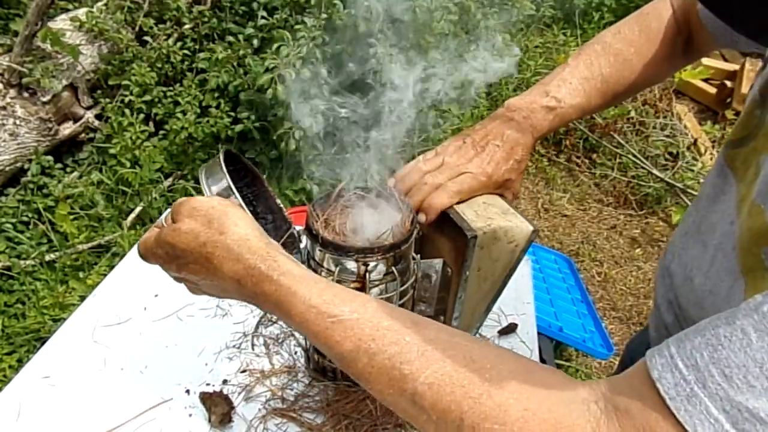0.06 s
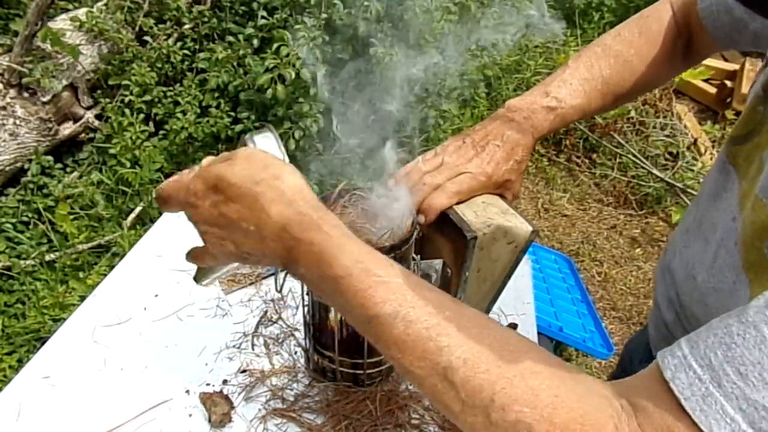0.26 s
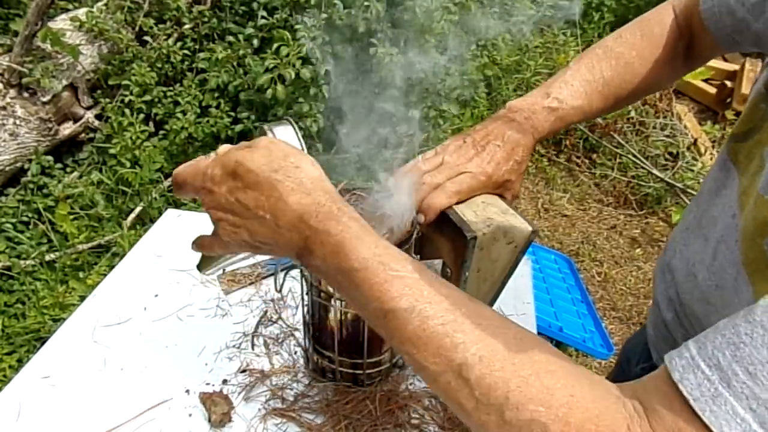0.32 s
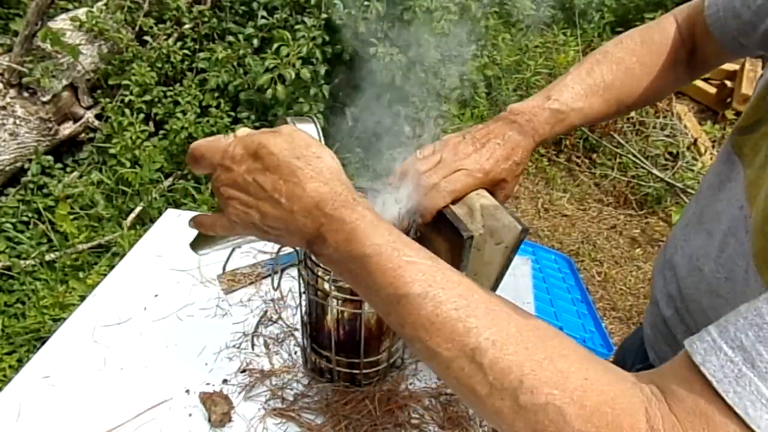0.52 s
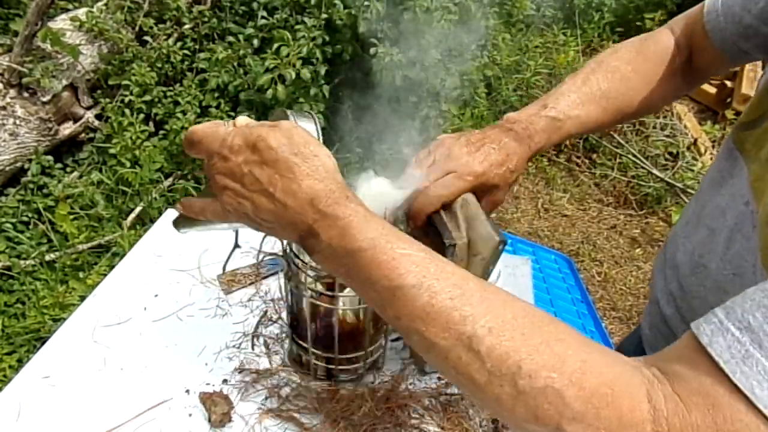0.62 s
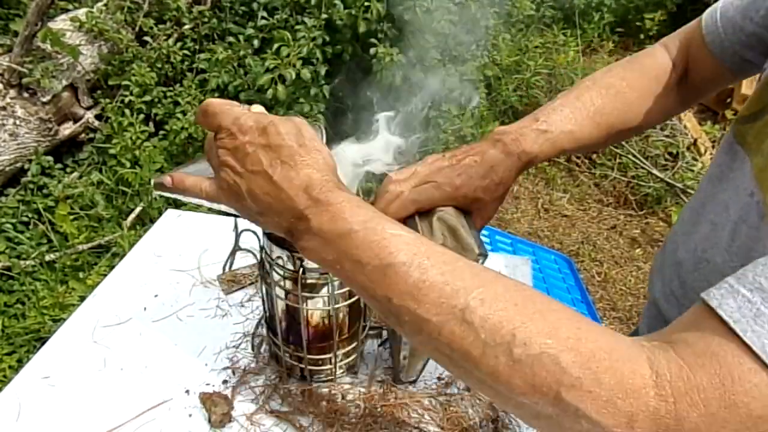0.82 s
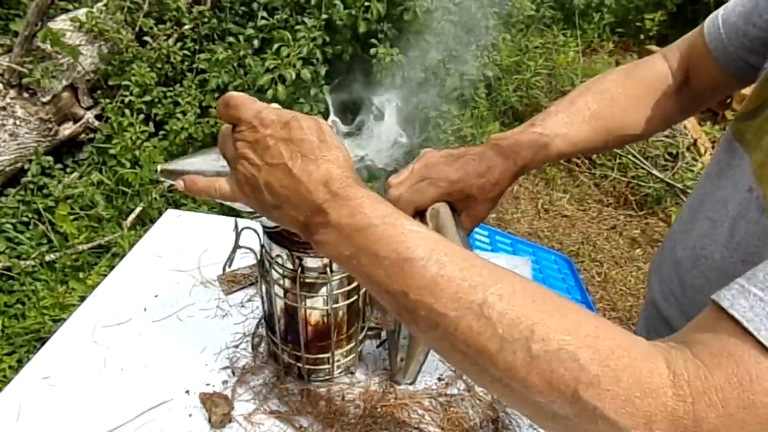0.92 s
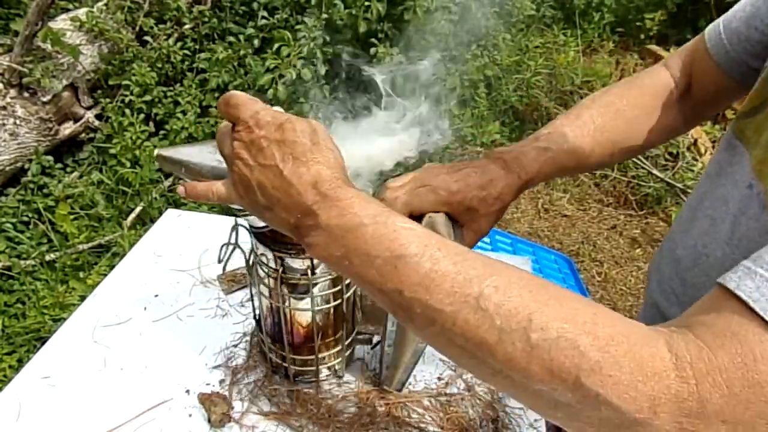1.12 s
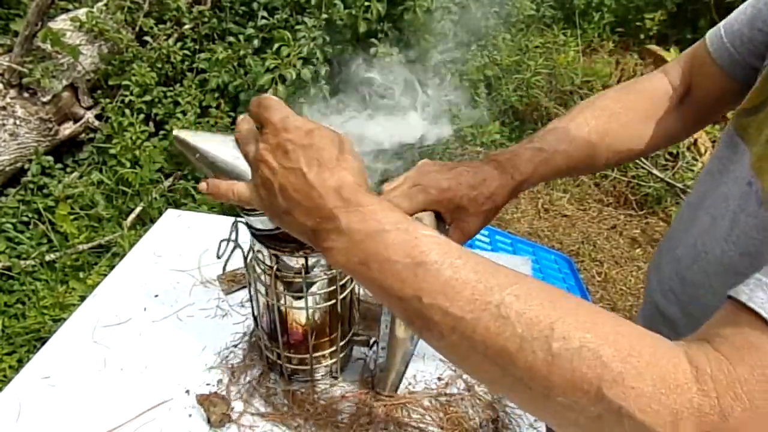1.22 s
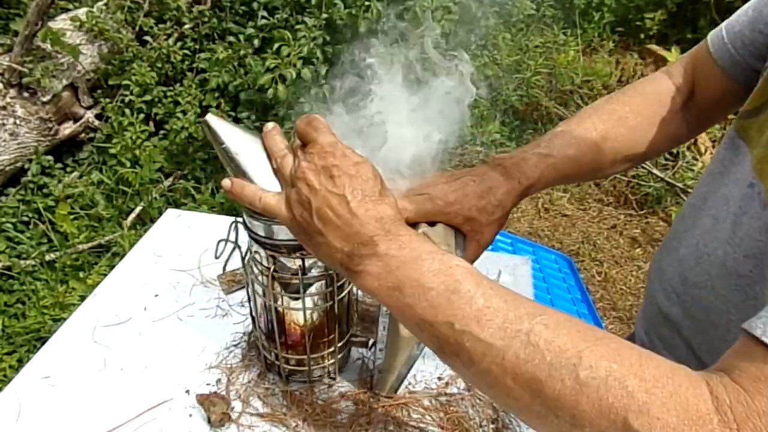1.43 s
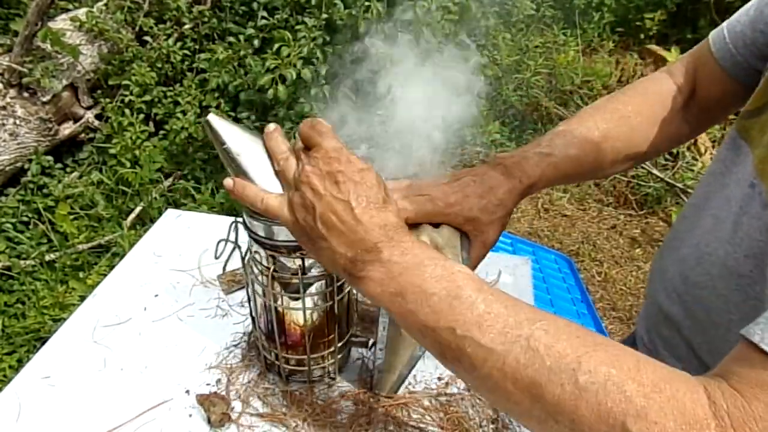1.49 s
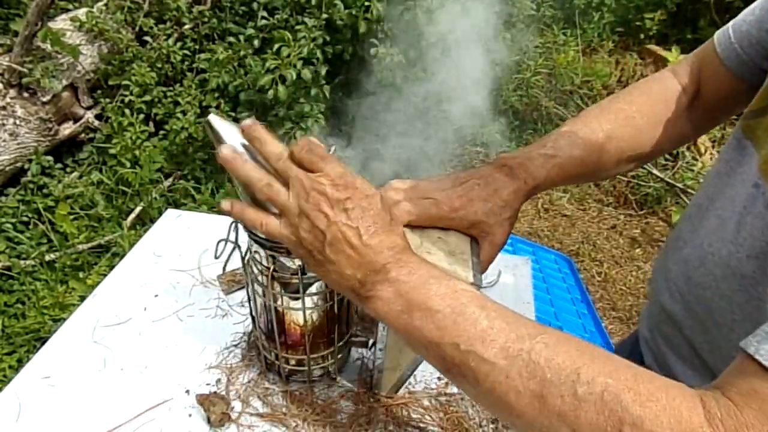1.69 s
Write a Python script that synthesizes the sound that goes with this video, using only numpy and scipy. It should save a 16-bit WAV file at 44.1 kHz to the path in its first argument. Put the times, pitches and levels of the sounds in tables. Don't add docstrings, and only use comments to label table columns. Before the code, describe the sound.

Hand bellows pumping a tin smoker, close up outdoors. Quiet leaf rustle, faint cricket chirps and tiny bird notes run throughout. At 0.2 s a short scrape ends in a sharp wood-and-tin clap with a bright wire snap. Breathy, hollow puffs follow near 0.55, 0.85 and 1.1 s, the last weaker, with valve sighs, dull thumps and metal ticks. After 1.25 s, thin whistles and small clicks fade.

```python
import sys
import numpy as np
from scipy import signal
from scipy.fft import rfft, irfft, next_fast_len
from scipy.io import wavfile
from scipy.ndimage import uniform_filter1d, map_coordinates

SR = 44100
rng = np.random.default_rng(int(sys.argv[2]) if len(sys.argv) > 2 else 0)


def level_to_linear(level):
    exponent = np.asarray(level, float) / 20
    return 10 ** exponent


def master_out(mix):
    frames = np.transpose(np.atleast_2d(mix))
    ceiling = np.clip(frames, -1, 1)
    pcm = np.round(ceiling * 32767).astype(np.int16)
    wavfile.write(sys.argv[1], SR, pcm)


N = 77175
T = np.arange(N) / SR


def unit(x):
    return x / np.sqrt(np.mean(x ** 2) + 1e-20)


def gain(points):
    hz_points, db_points = np.transpose(points)
    return lambda hz: level_to_linear(np.interp(np.log(hz + 1), np.log(hz_points), db_points))


def filtered(x, response):
    size = next_fast_len(N + 8192)
    return irfft(rfft(x, size) * response(np.fft.rfftfreq(size, 1 / SR)), size)[:N]


def wobble(rate):
    return map_coordinates(rng.standard_normal(N // 100), [T * rate])


def patchy(depth_db):
    z = signal.stft(rng.standard_normal(N), nperseg=256)[2]
    field = uniform_filter1d(rng.standard_normal(z.shape), size=5, axis=0)
    field = uniform_filter1d(field, size=8, axis=1)
    return signal.istft(z * level_to_linear(depth_db * unit(field)), nperseg=256)[1][:N]


def split(x):
    low = filtered(x, lambda hz: 1 / (1 + (hz / 3060) ** 4))
    return low, x - low


def swell(start, up, hold, down, curve):
    ramp = np.interp(T, np.cumsum([start, up, hold, down]), [0, 1, 1, 0])
    return np.sin(np.pi / 2 * ramp) ** curve


def glide(start, length, first_hz, last_hz, db, waver):
    u = np.clip((T - start) / length, 0, 1)
    hz = (first_hz + (last_hz - first_hz) * u) * (1 + waver * wobble(250))
    level = level_to_linear(db + 3 + 1.8 * wobble(100))
    return level * np.sin(np.pi * u) ** .7 * np.sin(2 * np.pi * np.cumsum(hz) / SR)


def ring(start, hz, t60, rise):
    t = np.maximum(T - start, 0)
    return level_to_linear(-60 * t / t60) * (1 - np.exp(-t / rise)) * np.sin(2 * np.pi * hz * (T - start))


def burst(start, rise):
    u = np.maximum(T - start, 0) / rise
    return u * np.exp(1 - u)


# frequency in Hz, level in dB per Hz.
YARD_SPECTRUM = [(60, -7), (110, -7), (200, 1.5), (450, -4.5), (1000, -13), (1300, -9), (6000, -12.5),
                 (11000, -24.5)]


def leaves():
    level = level_to_linear(-49 + 0.9 * wobble(2.2))
    rustle = level * unit(filtered(patchy(0.67), gain(YARD_SPECTRUM)))
    hiss = level_to_linear(-84) * rng.standard_normal(N)
    return rustle + hiss


# start in seconds, peak in dB, level of the dull part in dB, rise in seconds.
TICKS = [(0.0074, -48, -10, 0.0014), (0.1306, -42.5, -30, 0.002), (0.213, -42, 12, 0.0013),
         (0.2255, -27, 6, 0.0006), (0.2348, -22, 1, 0.0021), (0.24, -22, 5, 0.0012),
         (0.2432, -10, -2.5, 0.0012), (0.2502, -24, -13, 0.0024), (0.277, -41, -22, 0.001),
         (0.3047, -43, -8, 0.00086), (0.331, -41, -18, 0.0017), (0.391, -47, -10, 0.00077),
         (0.437, -32, 1.5, 0.00064), (0.511, -30, 4.5, .0025), (0.562, -26, 8, 0.00093),
         (0.6063, -14, -13, 0.00062), (0.6882, -27, 3, 0.00061), (0.792, -29.5, 3, 0.0022),
         (0.9522, -30.5, 5, 0.002), (1.0475, -28, -4, 0.0015), (1.0739, -18.5, -7, 0.0012),
         (1.078, -32, 6, 0.0025), (1.109, -20, -16, 0.00075), (1.1257, -27, 10, 0.00044),
         (1.2662, -25.5, -11, 0.00077), (1.431, -31, -3, 0.00082), (1.4473, -40, -2, 0.00078),
         (1.488, -37, 2, 0.00093), (1.678, -39, 3, 0.0017), (1.6834, -36, 6, 0.0006),
         (1.718, -41, -2, 0.00083), (1.729, -37.5, -3, 0.0013), (1.738, -38, -13, 0.0012)]


def ticks():
    bright = unit(filtered(rng.standard_normal(N), lambda hz: hz > 7500))
    dull = unit(filtered(rng.standard_normal(N), lambda hz: (hz > 900) * (hz < 7500) / (1 + hz / 2500)))
    out = np.zeros(N)
    for start, db, dull_db, rise in TICKS:
        out += level_to_linear(db - 4.5) * burst(start, rise) * (bright + level_to_linear(dull_db - 4.5) * dull)
    return out


# start in seconds, level in dB.
CHIRPS = [(.082, -53), (.315, -54), (.549, -53), (.782, -53), (1.012, -54), (1.226, -55), (1.478, -56),
          (1.709, -55)]
CRICKET_HZ, CRICKET_SAG_HZ, CRICKET_WAVER = 5400, 160, .04
PULSE_S, PULSE_GAP_S = .021, .0325


def cricket():
    rasp = unit(filtered(rng.standard_normal(N),
                         lambda hz: np.exp(-((hz / CRICKET_HZ - 1) / CRICKET_WAVER) ** 2)))
    uneven = rng.normal(0, 1.5, (len(CHIRPS), 3))
    first_hz, last_hz = CRICKET_HZ + CRICKET_SAG_HZ / 2, CRICKET_HZ - CRICKET_SAG_HZ / 2
    out = np.zeros(N)
    for (chirp_start, chirp_db), pulses in zip(CHIRPS, uneven):
        for k, uneven_db in enumerate(pulses):
            start, db = chirp_start + k * PULSE_GAP_S, chirp_db + uneven_db
            out += 0.88 * level_to_linear(db) * rasp * swell(start, PULSE_S / 2, 0, PULSE_S / 2, 0.79)
            out += glide(start, PULSE_S, first_hz, last_hz, db - 4, .01)
    return out


# start in seconds, length in seconds, first and last frequency in Hz, level in dB.
BIRD_NOTES = [(.356, .034, 3110, 3060, -52), (.382, .022, 3080, 2750, -55), (.398, .025, 2800, 2450, -57),
              (1.462, .034, 6200, 5100, -57), (1.5, .02, 6250, 5750, -59), (1.533, .022, 6250, 5750, -58),
              (1.598, .035, 3150, 2550, -59), (1.65, .03, 2700, 2350, -60), (1.702, .016, 2800, 3250, -59),
              (.168, .022, 5650, 5850, -61), (.19, .022, 5950, 6150, -60), (1.443, .016, 5600, 5300, -57)]


def birds():
    return sum(glide(*row, waver=.01) for row in BIRD_NOTES)


# time in seconds, peak in dB, pitch in Hz.
THUMPS = [(0.239, -18.5, 249), (0.469, -36.5, 170), (0.583, -24.5, 232), (0.673, -27.5, 171),
          (0.795, -33, 300), (0.863, -23.5, 372), (0.923, -31.5, 187), (0.955, -27.5, 183),
          (1.043, -28.5, 220), (1.085, -28, 318), (1.168, -24, 166), (1.286, -35.5, 199), (1.353, -36, 217),
          (1.535, -44, 353), (1.633, -33.5, 185), (1.679, -36, 266)]
# time in seconds, peak in
# dB, # frequency in Hz, T60 in seconds.
CLAP = [
    (.243, -18, 165, 0.11),
    (.2455, -12, 444, 0.023),
    (0.19, -37, 380, 0.06),
    (.242, -20.5, 1180, 0.063),
    (0.19, -26, 830, 0.01),
    (0.26, -25.5, 765, 0.041),
    (.61, -29, 190, 0.14),
    (.645, -32.5, 150, 0.092),
        (.2335, -15, 2600, .02),
    (.2455, -25, 3200, .07),
    (.236, -23, 5200, .015),
    (.2415, -21, 4500, .014),
]
THUMP_T60_S, THUMP_RISE_S, THUMP_DB = 0.056, 0.0054, 5.5


def thumps():
    contacts = [(start, db + THUMP_DB, hz, THUMP_T60_S) for start, db, hz in THUMPS]
    return sum(level_to_linear(db) * ring(start, hz, t60, THUMP_RISE_S) for start, db, hz, t60 in contacts + CLAP)


# start, rise, hold and fall in seconds, level in dB.
STROKES = [
    (0.46, 0.1, 0.017, 0.094, -25.5),
    (0.801, 0.046, 0.042, 0.056, -25.5),
    (1.082, 0.042, 0.025, 0.06, -27.5),
]
# start, rise, hold and fall in seconds, level in dB.
SCRAPE = [
    (.211, 0.0066, 0.027, 0.051, -31),
]
STROKE_TOP_DB = [0, 0.5, -1.5]
STROKE_MID_DB = [3, 2, 3]
STROKE_MID_HZ = [4500, 3270, 2860]
# frequency in Hz, level in dB per Hz.
JET_SPECTRUM = [(110, -36), (170, -11), (420, -8), (620, -27), (1050, -11.5), (1250, -10), (6000, -14),
                (15000, -12)]
# frequency in Hz, width in Hz, level in dB.
POT_MODES = [(332, 66, 0), (838, 95, 0), (1223, 73, -3), (1616, 97, 5), (2023, 130, -6.5), (2535, 44, 2),
             (3306, 220, -8.5), (4020, 520, -1), (4760, 51, -9.5)]
STROKE_CURVE, BRIGHT_CURVE = 2.2, 2.2 * 1.25
SPIT_PER_S, SPIT_DB, SPIT_SPREAD_DB = 900, -5, 5
MID_OCTAVES, POT_DB = 0.23, -2.5


def pot_response(f):
    return sum((-1) ** k * level_to_linear(db) * 1j * f * width / (hz * hz - f * f + 1j * f * width)
               for k, (hz, width, db) in enumerate(POT_MODES))


def blast():
    spit = rng.random(N) < SPIT_PER_S / SR
    spit = spit * level_to_linear(SPIT_SPREAD_DB * np.clip(rng.standard_normal(N), -2, 2))
    spit = spit * rng.choice([-1, 1], N)
    air = unit(patchy(2.24)) + level_to_linear(SPIT_DB) * unit(spit)
    jet = unit(filtered(air, gain(JET_SPECTRUM))) + level_to_linear(POT_DB) * unit(filtered(air, pot_response))
    jet = level_to_linear(0.91 * wobble(45.8) + 0.75 * wobble(200)) * unit(jet)
    low, high = split(jet)
    out = np.zeros(N)
    for (*times, db), top_db, mid_db, mid_hz in zip(STROKES, STROKE_TOP_DB, STROKE_MID_DB, STROKE_MID_HZ):
        mid = filtered(jet, lambda hz: np.exp(-(np.log2((hz + 1) / mid_hz) / MID_OCTAVES) ** 2))
        bright = level_to_linear(top_db) * high + (level_to_linear(mid_db) - 1) * mid
        out += level_to_linear(db) * (swell(*times, STROKE_CURVE) * low + swell(*times, BRIGHT_CURVE) * bright)
    for *times, db in SCRAPE:
        out += level_to_linear(db) * swell(*times, STROKE_CURVE) * (low + level_to_linear(-9.0) * high)
    return out


# time in seconds, peak in dB, tilt in dB per octave.
KNOCKS = [(0.214, -32, 3), (0.219, -39, 0.5), (0.226, -18, -6), (0.2376, -31, 11), (0.2439, -18, 9),
          (0.4803, -23, -5), (0.518, -16.5, -2), (0.9555, -29, -5), (1.1644, -30, -1), (1.681, -27, 0)]
# frequency in Hz, level in dB, T60 in seconds.
TIN_MODES = [(1220, -4, .035), (1620, -4, .03), (2580, -1, .02), (3200, -14, .03), (4300, -7, .012),
             (5400, -3, .012)]
KNOCK_DB, KNOCK_RISE_S = -6, .0018


def knocks():
    out = np.zeros(N)
    pivot_hz = TIN_MODES[1][0]
    for start, db, tilt_db in KNOCKS:
        for hz, mode_db, t60 in TIN_MODES:
            level_db = db + mode_db + rng.normal(0, 1.5) + KNOCK_DB + tilt_db * np.log2(hz / pivot_hz)
            out += level_to_linear(level_db) * ring(start, hz, t60, KNOCK_RISE_S)
    return out


# start in seconds, peak in dB, rise in seconds.
SNAPS = [
    (.2437, -12, .0007),
    (1.4308, -32, .0007),
    (1.4882, -30, .0009),
]
# frequency in Hz, level in dB.
SNAP_TONES = [(12900, 0), (14300, -3), (10400, -14)]


def snaps():
    thin = 0.77 * unit(filtered(rng.standard_normal(N), lambda hz: hz > 11800))
    thin = thin + sum(level_to_linear(db) * np.sin(2 * np.pi * hz * T) for hz, db in SNAP_TONES)
    return thin * sum(level_to_linear(db - 9) * burst(start, rise) for start, db, rise in SNAPS)


# peak time, rise and fall in seconds, level in dB, level of the top in dB.
SIGHS = [(.4, 0.046, 0.078, -38, -13), (0.491, 0.075, 0.076, -38, -3), (0.704, 0.16, 0.081, -34, 0.5),
         (0.794, 0.035, 0.042, -35.5, -5), (.97, 0.17, 0.06, -38.5, 0.5), (1.05, 0.087, 0.08, -36, 1.5),
         (1.198, 0.039, 0.045, -44, -10), (1.289, 0.13, 0.091, -49.5, 7.5), (1.438, 0.38, 0.13, -46, -4.5),
         (1.58, 0.058, 0.021, -59, 8.5), (1.64, .06, .05, -64, 8), (1.719, 0.038, 0.018, -41.5, -7.5)]
# frequency in Hz, level in dB per Hz.
VALVE_SPECTRUM = [(110, -13), (190, -3), (400, -4), (1080, -12), (1220, -2), (3000, -13), (7000, -13),
                  (15000, -9)]
# start and length in seconds, first and last frequency in
# Hz, level in dB.
WHISTLES = [(.85, .085, 810, 895, -38), (.865, .06, 1620, 1760, -39), (1.115, .025, 3150, 2900, -42),
            (.815, .11, 385, 320, -37), (.57, .075, 245, 185, -38), (1.1, .06, 330, 365, -41)]
# start and length in seconds, first and last frequency in Hz, level in dB.
LEAKS = [(1.285, .04, 13450, 12950, -51), (1.315, .03, 13050, 11500, -51), (1.335, .03, 11700, 10050, -53),
         (1.357, .032, 10400, 8850, -54), (1.24, .03, 13150, 12900, -54), (1.366, .018, 11450, 11300, -60),
         (1.39, .014, 11450, 11450, -59), (1.41, .014, 11450, 11450, -60)]


def valve():
    flutter = level_to_linear(0.66 * wobble(39.3))
    low, high = split(flutter * unit(filtered(patchy(1.8), gain(VALVE_SPECTRUM))))
    out = np.zeros(N)
    for peak, up, down, db, top_db in SIGHS:
        out += level_to_linear(db) * swell(peak - up, up, 0, down, 1.3) * (low + level_to_linear(top_db) * high)
    out += sum(glide(*row, waver=.01) for row in WHISTLES)
    return out + sum(glide(*row, waver=.006) for row in LEAKS)


def scene():
    smoker = blast() + valve() + thumps() + ticks() + knocks()
    surroundings = leaves() + cricket() + birds()
    return (smoker + surroundings + snaps())[None]


# frequency in Hz, level in dB.
MIC_COLOUR = [(6500, 1), (7600, -4.5), (8500, -11), (10300, 4), (11600, 0), (12900, 6), (13600, -1.5),
              (15500, -13)]
# frequency in Hz, width in Hz.
MIC_NOTCHES = [(3660, 336), (3715, 200), (7845, 540), (11715, 450)]


def microphone(f):
    notches = np.prod([(hz * hz - f * f) / (hz * hz - f * f + 1j * f * width) for hz, width in MIC_NOTCHES],
                      axis=0)
    low_cut = (1j * f / (75 + 1j * f)) ** 4
    return gain(MIC_COLOUR)(f) * notches * low_cut * (f < 15750)


def low_pass(x):
    return signal.sosfilt(signal.butter(12, 15810, fs=SR, output="sos"), x)


def record(dry):
    mix = filtered(dry[0], microphone)[None]
    return low_pass(mix)


dry = scene()
out = record(dry)
master_out(out)
```